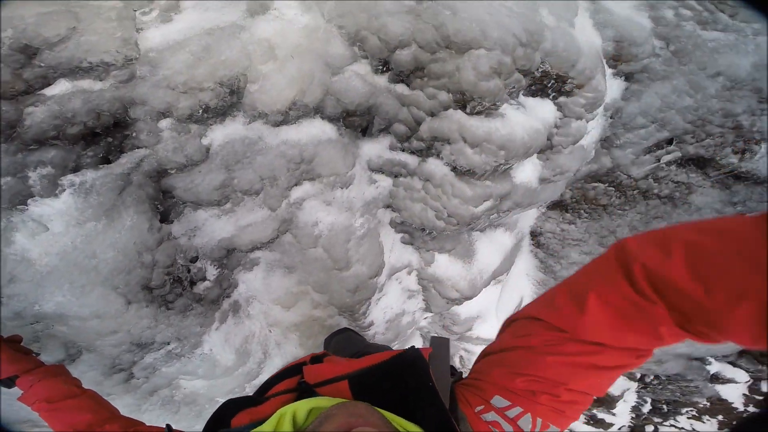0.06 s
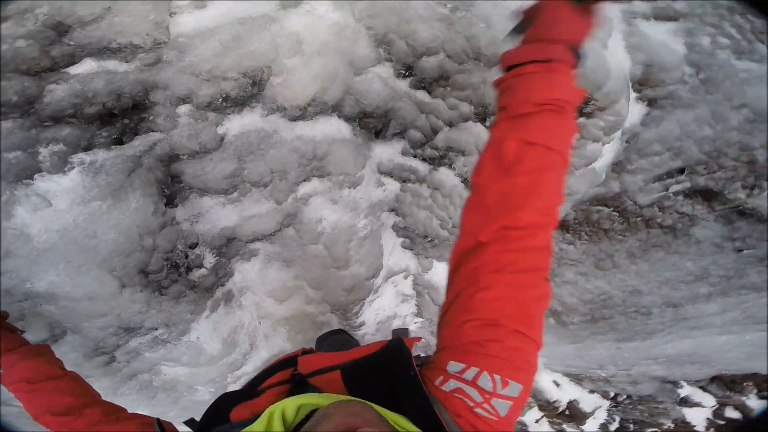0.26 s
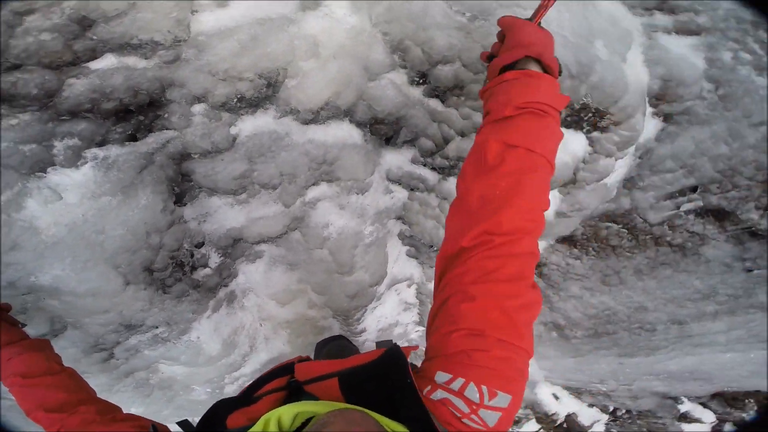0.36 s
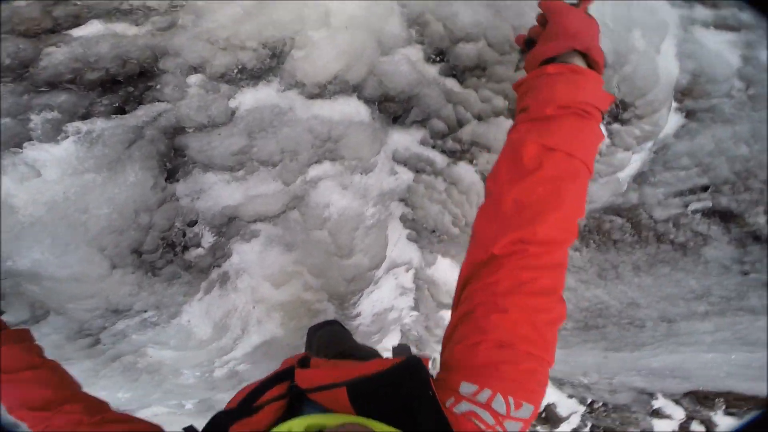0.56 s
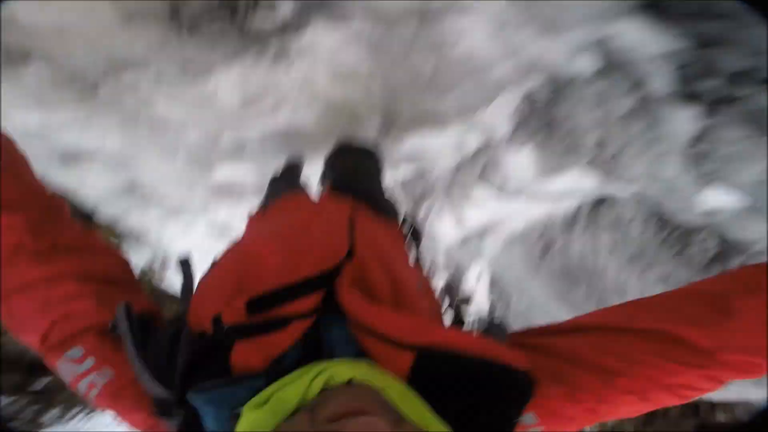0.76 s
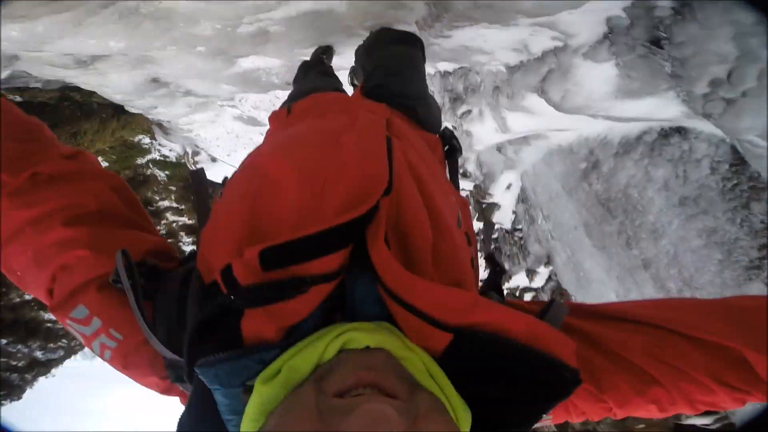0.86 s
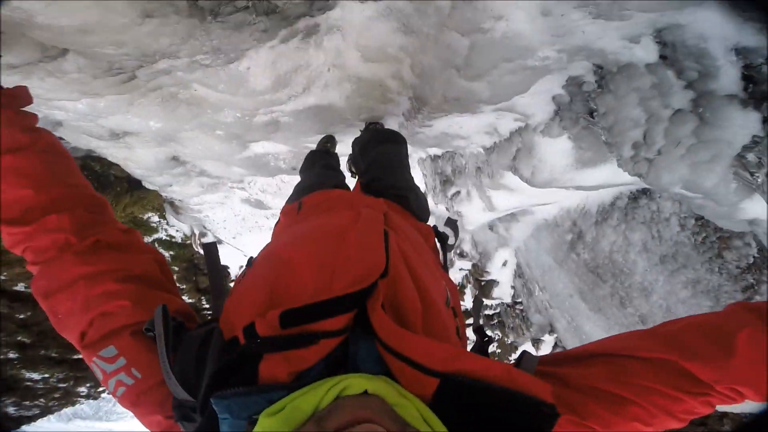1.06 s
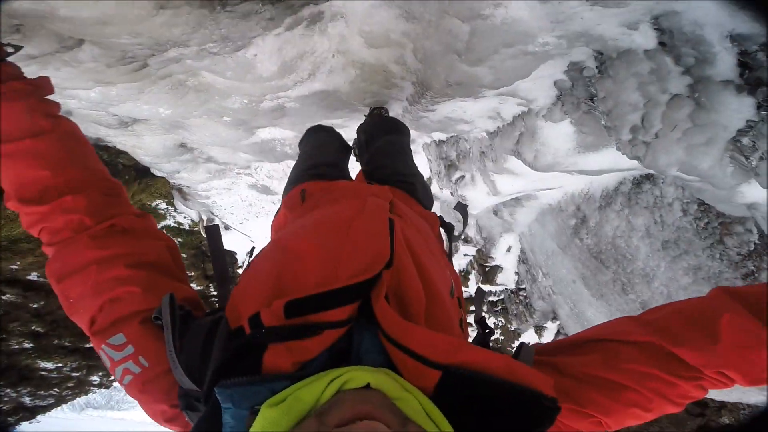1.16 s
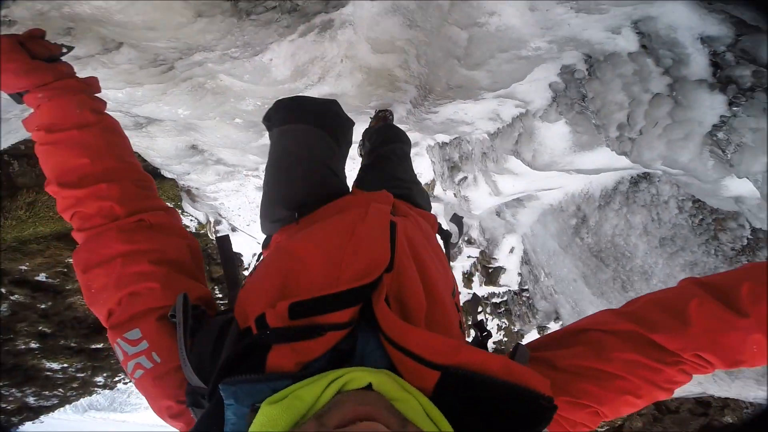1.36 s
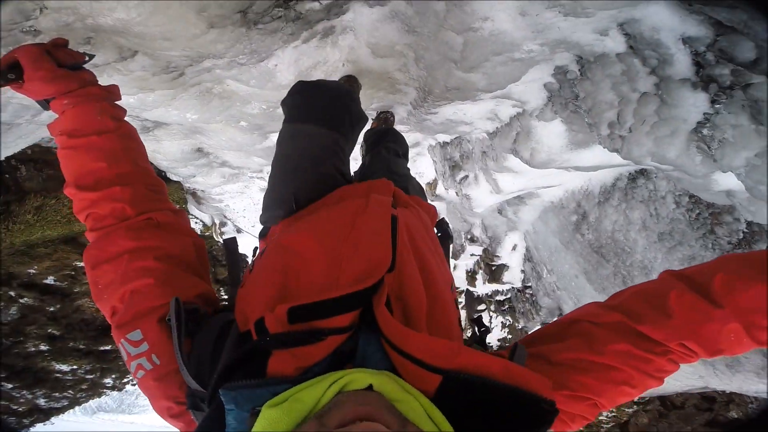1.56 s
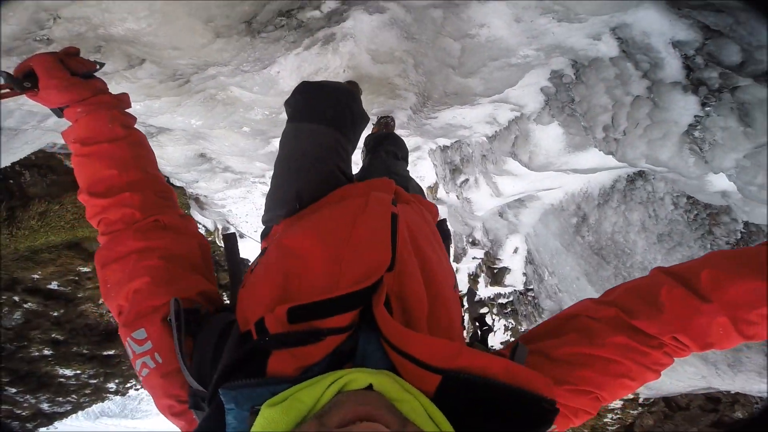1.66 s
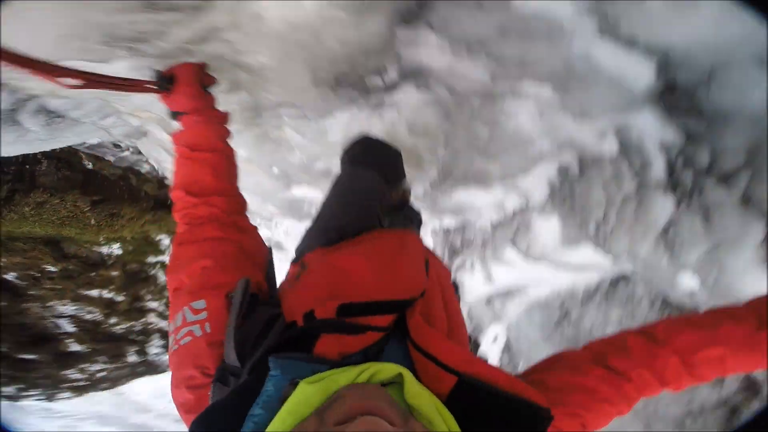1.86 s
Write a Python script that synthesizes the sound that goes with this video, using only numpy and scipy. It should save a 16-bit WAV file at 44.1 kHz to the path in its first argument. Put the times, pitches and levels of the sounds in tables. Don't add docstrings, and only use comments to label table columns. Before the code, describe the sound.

Ice climbing heard from a camera on the climber's helmet: one sharp pick strike with crumbling chips, a cluster of plastic knocks and clinking gear, then a metallic boot kick shattering ice over faint rumble and rustle.

```python
import sys
import numpy as np
from scipy import signal
from scipy.fft import rfft, irfft, next_fast_len
from scipy.io import wavfile
from scipy.ndimage import uniform_filter1d, map_coordinates

SR = 44100
rng = np.random.default_rng(int(sys.argv[2]) if len(sys.argv) > 2 else 0)


def gain_from_decibels(decibels):
    exponent = np.asarray(decibels, float) / 20
    return 10 ** exponent


def dump(signal):
    limited = np.clip(np.atleast_2d(signal).T, -1, 1)
    pcm = np.round(limited * 32767).astype(np.int16)
    wavfile.write(sys.argv[1], SR, pcm)


N = 83790


def unit(x):
    return x / np.sqrt(np.mean(x ** 2) + 1e-20)


def curve(rows):
    times, levels = np.transpose(rows)
    return gain_from_decibels(np.interp(np.arange(N) / SR, times, levels))


def wobble(rate):
    knots = rng.standard_normal(int(N * rate / SR) + 4)
    return map_coordinates(knots, [np.arange(N) * rate / SR])


def noise(tone, grain_db, rate):
    size = next_fast_len(N + 8192)
    hz, levels = np.transpose(tone)
    bins = np.fft.rfftfreq(size, 1 / SR)
    gain = gain_from_decibels(np.interp(np.log(bins + 1), np.log(hz + 1), levels))
    lumpy = rng.standard_normal(N) * gain_from_decibels(grain_db * wobble(rate))
    return unit(irfft(rfft(lumpy, size) * gain, size)[:N])


def burst(start, db, t60):
    age = np.maximum(np.arange(N) / SR - start, 0)
    return gain_from_decibels(db - 60 * age / t60) * (1 - np.exp(-age * 1500))


def snaps(table, t60, wide):
    out, t = np.zeros(N + SR), np.arange(1024) / SR
    bins = np.fft.rfftfreq(1024, 1 / SR)
    for start, db, hz in table:
        band_gain = np.exp(-(np.log((bins + 1) / hz) / wide) ** 2)
        band = unit(irfft(rfft(rng.standard_normal(1024)) * band_gain))
        out[round(start * SR):][:len(t)] += gain_from_decibels(db - 60 * t / t60) * band
    return out[:N]


def struck(modes, hits, rise, late_db, early_t60, rough, press_s=0):
    out, t = np.zeros(N + SR), np.arange(SR // 4) / SR
    age = np.maximum(t - press_s, 0)
    contact = gain_from_decibels(late_db) + gain_from_decibels(-60 * age / early_t60)
    for start, db, corner_hz in hits:
        kicks = uniform_filter1d(rng.standard_normal((len(modes), len(t))), size=100, axis=1)
        drift = rough * np.cumsum(kicks, axis=1) / np.sqrt(SR)
        ring = np.zeros(len(t))
        for k, (hz, level, t60) in enumerate(modes):
            dulling = 1 + (hz / corner_hz) ** 2
            build_up = (1 - np.exp(-t * hz / rise)) ** 2
            if press_s:
                wave = np.cos(2 * np.pi * hz * (t - press_s) + drift[k])
            else:
                wave = (-1) ** k * np.sin(2 * np.pi * hz * t + drift[k])
            ring += gain_from_decibels(level - 60 * age / t60) / dulling * build_up * wave
        out[round(start * SR):][:len(t)] += gain_from_decibels(db) * ring * contact
    return out[:N]


def handling_rumble():
    # (time [s], level [dB])
    movement = [(0, -55), (.17, -61), (.23, -36.5), (.3, -29.5), (.38, -32.5), (.46, -29), (.53, -41),
                (.6, -36), (.66, -43), (.75, -38), (.87, -45), (.96, -57.5), (1.12, -49), (1.52, -42.5),
                (1.68, -43), (1.78, -60), (1.9, -44.5)]
    # (frequency [Hz], level [dB])
    tone = [(12, -23.5), (20, 2), (53, -3.5), (98, -1), (220, -11), (276, -16), (500, -25.5), (650, -52.5),
            (1100, -120)]
    return curve(movement) * noise(tone, grain_db=2.0, rate=38)


def wind():
    # (time [s], level [dB])
    gusts = [(0, -53), (.08, -50.5), (.17, -55.5), (.55, -52.5), (.59, -53), (.65, -53.5), (.76, -41.5),
             (1, -68), (1.12, -66), (1.2, -66.5), (1.5, -58.5), (1.78, -62), (1.9, -52)]
    # (frequency [Hz], level [dB])
    tone = [(150, -77), (250, -25), (294, -3.5), (338, -15), (583, -3), (873, -12), (1600, -32),
            (2080, -27), (3520, -120)]
    return curve(gusts) * noise(tone, grain_db=3.5, rate=25)


def jacket_rustle():
    # (time [s], level [dB])
    strokes = [(0, -61.5), (.36, -60.5), (.55, -66), (.63, -62.5), (.72, -60.5), (.74, -80.5), (.765, -74),
               (.78, -65.5), (.82, -71), (.92, -79), (1.09, -75), (1.3, -71), (1.5, -64.5), (1.9, -69)]
    # (frequency [Hz], level [dB])
    tone = [(600, -42.5), (1000, -3.5), (2000, -3.5), (4460, -6), (7240, -11.5), (9430, -7.5), (13600, -17),
            (15600, -29)]
    return curve(strokes) * noise(tone, grain_db=1.5, rate=120)


def small_snaps():
    # (time [s], level [dB], frequency [Hz])
    fabric = [(.009, -49, 3080), (.086, -52, 9050), (.142, -52, 9000), (.1416, -56, 2900),
              (.338, -56, 3500), (.511, -53, 8900), (.6086, -57, 3120), (.616, -54, 5000),
              (.628, -52, 8000), (0.651, -49, 1750), (.7, -49, 3000), (.706, -50, 8200), (.712, -48, 2000),
              (.883, -53, 11400), (1.287, -56.5, 2300), (1.346, -59, 2300), (1.353, -55.5, 3100),
              (1.67, -46, 2900), (1.687, -57, 8300)]
    # (time [s], level [dB], frequency [Hz])
    clicks = [(.1625, -47.5, 9500), (.244, -48, 5000), (.2728, -44.5, 9000), (.6845, -42, 5100),
              (.6875, -49, 6500), (.732, -40, 4800), (.7347, -36, 5000), (.7488, -39.5, 4500),
              (.7503, -33.5, 4470), (.7905, -41.5, 2300), (.7986, -50, 4300), (.829, -47, 5500),
              (.8335, -49, 5000), (.8531, -50.5, 3800), (.874, -56, 3800), (.966, -53.5, 9500),
              (1.201, -62, 3500), (1.447, -54, 10200), (1.488, -58, 9500)]
    return snaps(fabric, t60=0.012, wide=0.17) + snaps(clicks, t60=0.0088, wide=0.48)


def housing_rattle():
    starts = [.4975, .727, .79, .8225, .883]
    levels = [-40, -30, -46.5, -35, -44]
    # (frequency [Hz], level [dB])
    tone = [(400, -44.5), (1200, 4), (4000, -9.5), (6500, -24.5), (9000, -43.5)]
    buzz = sum(burst(s, db, 0.035) + burst(s, db - 15.5, 0.16) for s, db in zip(starts, levels))
    return buzz * noise(tone, grain_db=0.0, rate=700)


def ice():
    starts = [
        .394,
        .6845,
        1.5935,
        1.605,
        1.882,
    ]
    # (level [dB], crack t60 [s], tail level re crack [dB], tail t60 [s])
    breaks = [(-20, 0.059, -11.5, 0.2), (-42, 0.03, -3, 0.19), (-32, 0.089, -6, 0.25),
              (-23, 0.034, -21, 0.23), (-56, 0.27, -3, .3)]
    # (frequency [Hz], level [dB])
    tone = [(150, -49), (450, -12), (800, -10), (1200, -22), (3000, -20.5), (5000, -26), (8000, -29),
            (15000, -38.5)]
    chip_tone = [(hz, db - 3 * max(np.log2(hz / 3000), 0)) for hz, db in tone]
    crack, fall = np.zeros(N), np.zeros(N)
    for start, (db, crack_t60, tail_db, tail_t60) in zip(starts, breaks):
        crack += burst(start, db, crack_t60)
        fall += burst(start, db + tail_db, tail_t60)
    clumps = gain_from_decibels(1.8 * wobble(70))
    crunch = crack * noise(tone, grain_db=-0.5, rate=1100)
    return crunch + fall * clumps * noise(chip_tone, grain_db=2.0, rate=500)


def hanging_gear():
    # (frequency [Hz], level [dB], t60 [s])
    gear = [(3500, -7, .06), (4000, 3, .07), (4630, -7.5, .09), (5004, -1, 0.078), (5640, -3.5, 0.072),
            (6500, -12, .1), (8100, -13, 0.052), (9500, -13, 0.047)]
    gear_ring = [(2789, 2, .09), (2950, -3.5, .1), (3650, -4.5, .11), (3946, -7.5, .13), (4732, -2, .1),
                 (4850, 0.5, .1), (5243, -3.5, 0.093), (5507, -1.5, .08), (6492, -5, .07), (8100, -10, .05),
                 (9600, -11.5, .05)]
    # (time [s], level [dB], dulling corner [Hz])
    jingles = [(.7322, -42, 7000), (.7347, -36, 14000), (.7488, -42, 14000), (.7505, -34, 9000)]
    rings = [(.7347, -56, 20000), (0.7507, -52.5, 14000)]
    return struck(gear, jingles, 1.6, -24, 0.0098, 40) + struck(gear_ring, rings, 2.4, 0.1, 0.01, 4.7)


def crampon():
    # (frequency [Hz], level [dB], t60 [s])
    points = [(295, -2, 0.023), (508, 2, 0.039), (800, -8.5, 0.055), (1306, -20.5, 0.041),
              (1943, -11.5, 0.053), (3020, -12.5, 0.025), (4560, -6.5, .012), (7880, -9.5, 0.0074)]
    # (time [s], level [dB], dulling corner [Hz])
    kick = [(1.5935, -27, 4000), (1.598, -25.5, 9000), (1.6018, -24, 6000), (1.6055, -13.5, 9000),
            (1.6121, -29.5, 5000), (1.617, -27, 2000), (1.628, -30.5, 1800), (1.646, -35.5, 1500),
            (1.668, -29.5, 1000)]
    return struck(points, kick, 0.52, -3.5, 0.042, 15.2)


def ice_tool():
    # (frequency [Hz], level [dB], t60 [s])
    pick = [(279, -7.5, 0.086), (441, 1, 0.074), (922, -4, 0.06), (1962, -10.5, 0.034), (3090, 2.5, 0.014),
            (4915, -2, 0.016), (8160, -9.5, .012), (12000, -16.5, 0.015)]
    shaft = [(2100, -5, .12), (3180, 0.5, 0.21), (4550, 1, 0.18), (4950, -1.5, .15), (7300, -8.5, .12),
             (10300, -11, .15), (11900, -1.5, 0.18)]
    # (time [s], level [dB], dulling corner [Hz])
    bite = [(0.395, -12, 13910), (0.3966, -20.5, 4954), (0.398, -15.5, 3000), (0.4035, -13, 1200),
            (0.4096, -27.5, 800)]
    quiver = [(.4, -43, 20000)]
    return struck(pick, bite, 0.52, -6, 0.022, 8.4) + struck(shaft, quiver, 30, 0.1, 0.01, 25)


def soft_contacts():
    # (frequency [Hz], level [dB], t60 [s])
    tap = [(644, 1.5, 0.052), (876, -2, .05), (1110, -8.5, 0.02), (1450, -12.5, 0.027)]
    thud = [(117, -2, 0.1), (215, 0.5, 0.055)]
    # (time [s], level [dB], dulling corner [Hz])
    taps = [(.034, -44, 600), (.067, -42, 600), (.077, -37, 800), (.458, -25.5, 3000), (.586, -35, 700),
            (0.7912, -27, 894), (.861, -32, 700), (1.045, -56, 3000), (1.114, -44.5, 900),
            (1.423, -43.5, 3000), (1.466, -50, 700), (1.8215, -32, 800), (1.888, -35, 900)]
    thuds = [(.402, -18, 350), (.57, -31.5, 600), (.583, -30, 600), (.72, -26, 540), (0.76, -39.5, 400),
             (.852, -31.5, 300)]
    return struck(tap, taps, 1.0, -4, 0.03, 16) + struck(thud, thuds, 0.2, -4.5, 0.058, 15)


def helmet_shell():
    # (frequency [Hz], level [dB], t60
    # [s])
    crown = [(560, 1, 0.013), (704, -1, 0.028), (872, -5, 0.054), (1033, -5.5, 0.015), (1803, -23.5, 0.03),
             (2290, -30, 0.022)]
    brim = [(583, -11, 0.075), (700, 14.5, 0.0083), (690, -13, .05), (914, -0.5, .028), (1120, -1.5, .013),
            (1384, 0, 0.015), (1940, -22.5, 0.028), (2146, -11.5, .009)]
    nape = [(516, -0.5, 0.034), (682, -0.5, 0.028), (864, -8.5, 0.054), (1035, -7, 0.023),
            (1994, -29, .008), (3050, -40, 0.092)]
    mount = [(418, 3, 0.016), (646, 2.5, 0.021), (1000, -13.5, .06), (1475, -11.5, .03),
             (1800, -8.5, 0.0064), (2940, -12, .007), (4100, -28, .008)]
    shell_highs = [(1700, 6, .02), (2254, 0, 0.021), (3300, -2.5, .015), (3750, -6, 0.015), (5570, -6.5, .014)]
    # (time [s], level [dB],
    # dulling corner [Hz])
    crown_knocks = [(0.496, -21, 20000)]
    brim_knocks = [(0.82244, -13, 20000), (0.8289, -41.5, 9140)]
    nape_knocks = [(0.8815, -18, 20000)]
    mount_knocks = [(0.6872, -36, 2500), (0.7258, -11, 20000), (.7892, -32, 4000)]
    high_knocks = [(0.4973, -29.5, 8900), (0.8227, -22.5, 7000), (0.8834, -29.5, 8940)]
    shell = struck(brim, brim_knocks, 1.27, 5, 0.05, 3, press_s=0.00044)
    shell += struck(crown, crown_knocks, 1.5, 5.7, 0.04, 3, press_s=0.00294)
    shell += struck(nape, nape_knocks, 1.45, 5.3, 0.045, 4.8, press_s=0.003015)
    shell -= struck(mount, mount_knocks, 1.42, -29.5, 0.0216, 2.6, press_s=0.00214)
    return shell + struck(shell_highs, high_knocks, 0.55, -3.5, 0.0096, 29)


def scene():
    background = handling_rumble() + wind() + jacket_rustle() + small_snaps()
    steel = hanging_gear() + crampon() + ice_tool()
    helmet = soft_contacts() + helmet_shell()
    return (background + housing_rattle() + ice() + steel + helmet)[None]


def top_cut(x):
    return signal.sosfilt(signal.butter(12, 15800, fs=SR, output="sos"), x)


def record(dry):
    limited = dry / (1 + np.abs(dry / 0.52) ** 4) ** (1 / 4)
    low_pass = signal.cheby2(N=12, rs=50, Wn=15800, fs=SR, output="sos")
    return top_cut(signal.sosfilt(low_pass, limited))


dry = scene()
out = record(dry)
dump(out)
```